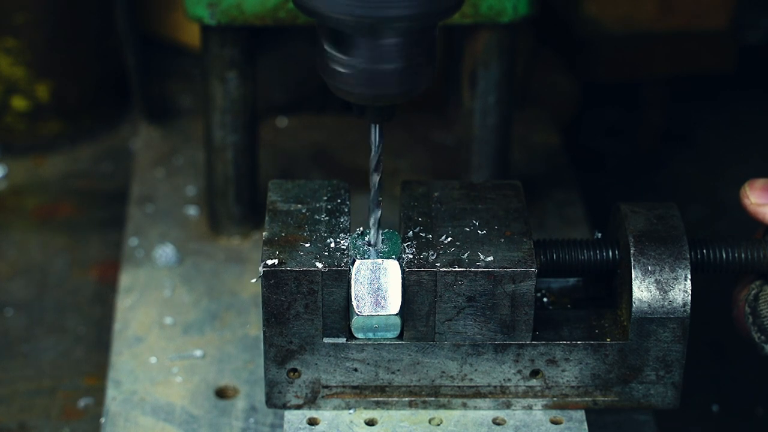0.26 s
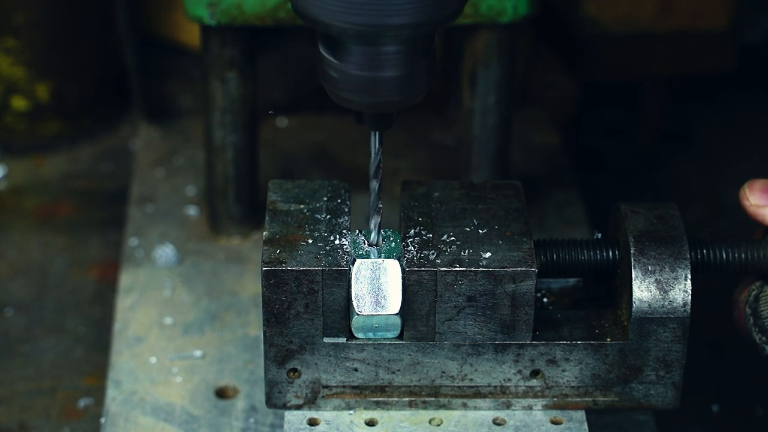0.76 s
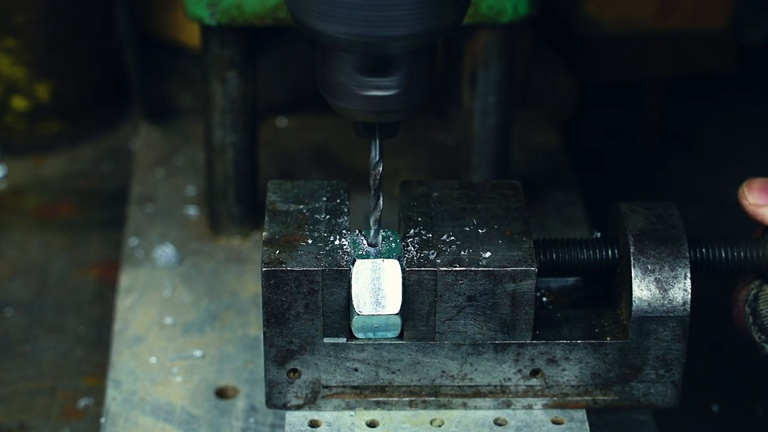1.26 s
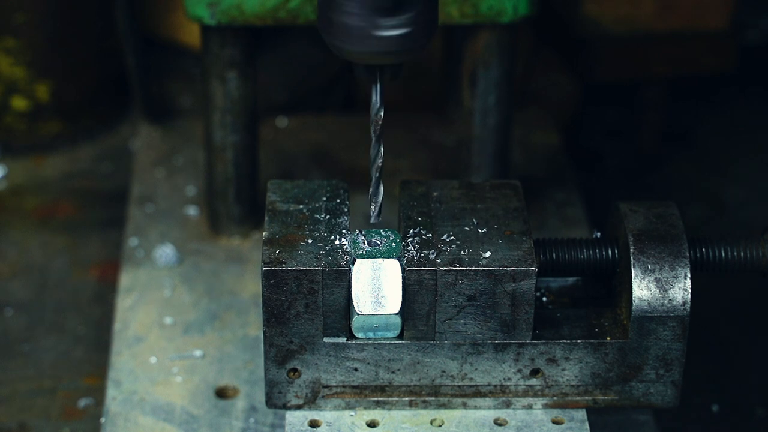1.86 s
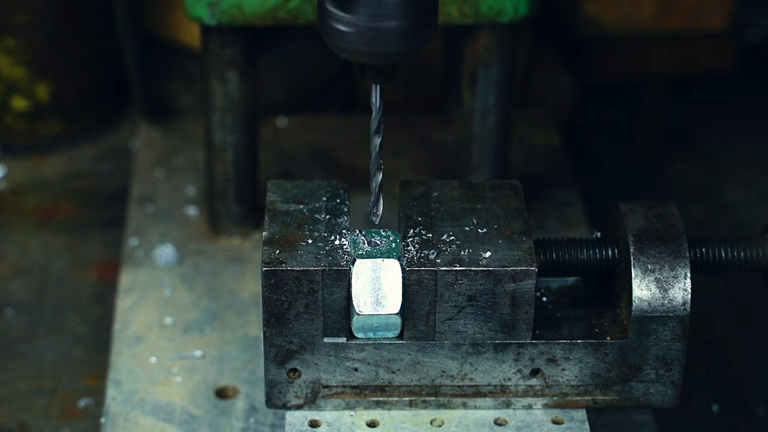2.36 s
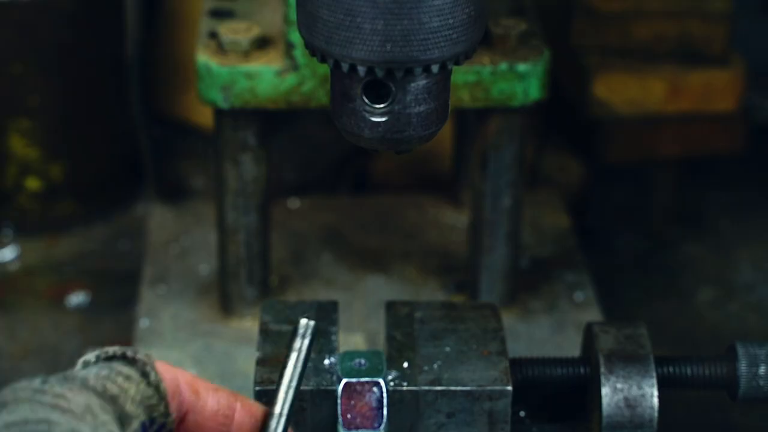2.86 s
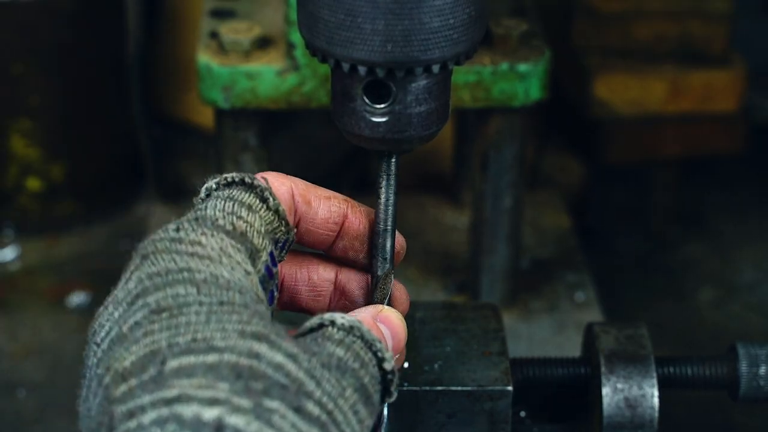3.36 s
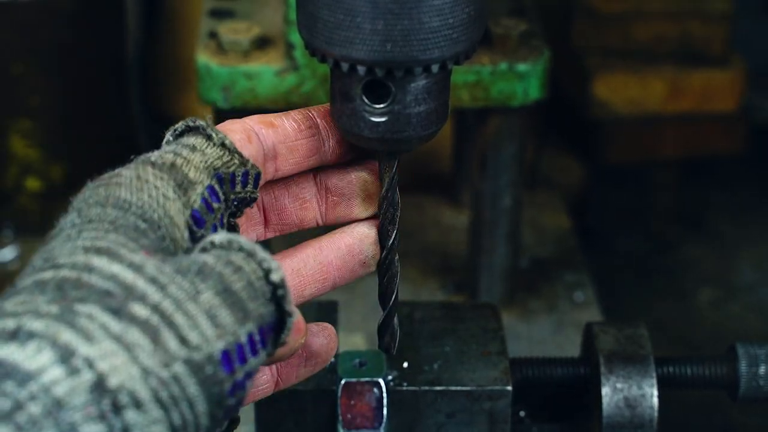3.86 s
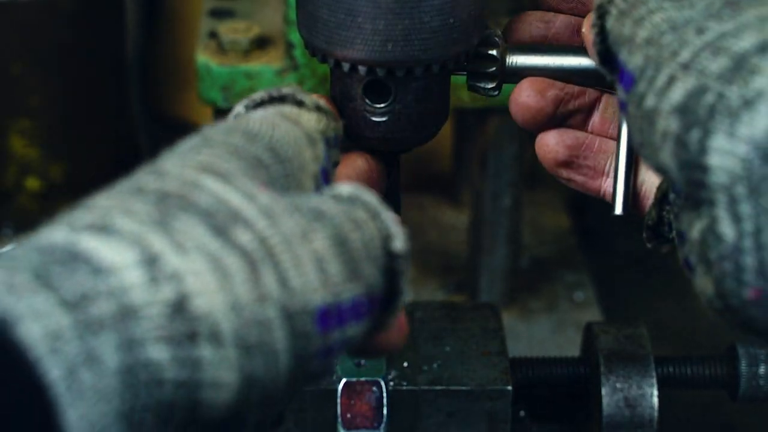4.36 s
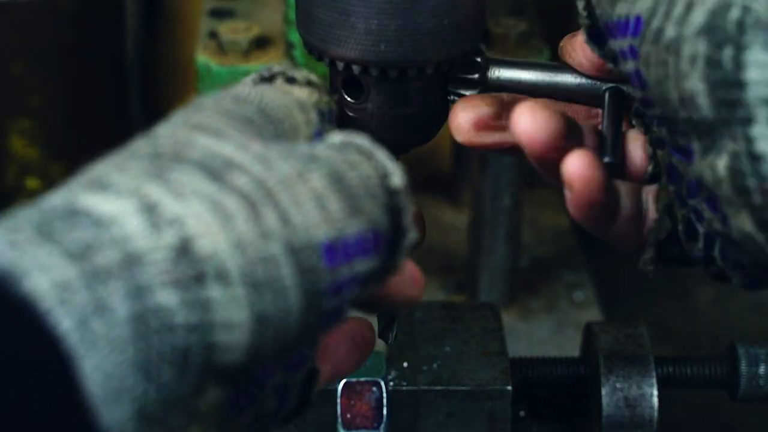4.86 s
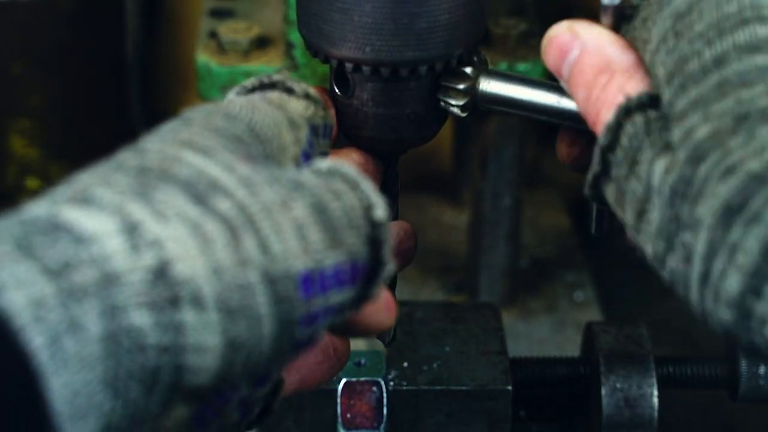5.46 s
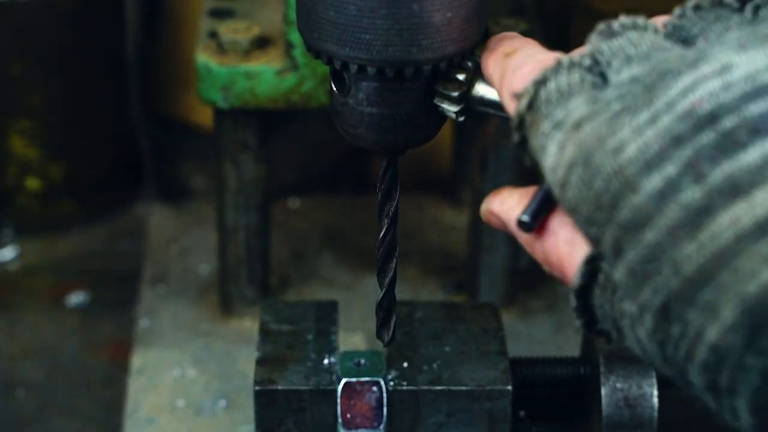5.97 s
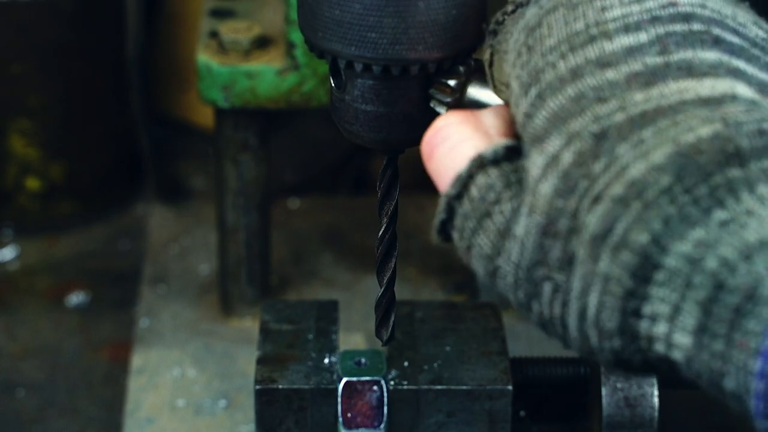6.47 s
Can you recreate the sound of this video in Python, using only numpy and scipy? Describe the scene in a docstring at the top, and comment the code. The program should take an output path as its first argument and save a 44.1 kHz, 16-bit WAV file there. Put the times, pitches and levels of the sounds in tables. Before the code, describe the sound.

Close in a small workshop, a drill press rattles loudly while its bit grinds a steel nut, chattering, chirping and squealing. Grinding fades as the bit lifts and spins free with knocks. The machine cuts off abruptly. Over quiet wide hiss, a fresh bit ticks and scrapes into the chuck, a key clicks sharply in its teeth, and gloves rustle softly with faint dull knocks.

```python
"""Drill press, then a new bit

A rattling drill press bores into a steel nut: shaped noise grinds and rattles, gliding chirps chatter in step
with the spindle, shrill noise squeaks, short tones whistle; the grinding fades as the bit lifts and spins free.
The machine sound then cuts off abruptly. Over a quiet hiss a new bit taps the chuck and slides in, and the
chuck key clicks into the gear teeth and is turned tight: short noise bursts ring the steel parts.
"""
import sys
import numpy as np
from scipy import signal
from scipy.fft import rfft, irfft, next_fast_len
from scipy.io import wavfile
from scipy.ndimage import uniform_filter1d, map_coordinates

SR = 44100
rng = np.random.default_rng(int(sys.argv[2]) if len(sys.argv) > 2 else 0)


def materialize(psi):
    """Save the field psi as 16-bit PCM at rate SR to the path in sys.argv[1].

    A 1-D psi becomes a single channel; in a 2-D psi each row is a channel.
    """
    bounded = np.clip(np.atleast_2d(psi).T, -1, 1)
    quanta = np.round(bounded * 32767).astype(np.int16)
    wavfile.write(sys.argv[1], SR, quanta)


N = 295896
TIME = np.arange(N) / SR
STOP_S = 2.774  # the machine is silent from here on
SPINDLE_HZ, MOTOR_HZ, BELT_HZ = 37.97, 24.2, 13.8  # turns per second
TOP_HZ = 15950  # middle of the final treble cut-off
# A blow thuds below THUD_HZ; its brightness is the level at its treble edge over that at CLINK_HZ.
THUD_HZ, CLINK_HZ = 895, 2840
EDGE_FALL_DB = 20.5  # lost in the octave above the edge
LAG_HZ = 701  # the body answers late mostly below this
CATCH_S, GLIDE_S = 0.00054, 0.0007  # time to a chirp's peak; time constant of its glide
STRETCH = .22  # how much chirps differ in length (natural log)
FREE_RING_HZ, BOUND_DAMPING = (5550, 6200), 0.29  # band of the free bit's song; share lost while caught

# The running press, steadied while the bit is in the nut: (time [s], rattle level [dB])
RUNNING = [(0, -20.5), (.3, -26.5), (1.35, -24.5), (1.6, -22), (2.25, -18.5), (2.55, -21)]
# The feed: a steady cut, the breakthrough, then the bit is drawn out: (time [s], grinding level [dB])
FEED = [(0, -23), (.75, -23), (.8, -30), (1.45, -37.5), (1.8, -59)]
# The lips bite deeper: (middle [s], length [s], level [dB])
BITES = [(.025, 0.096, -29), (.21, 0.09, -22), (.335, 0.11, -20.5), (.745, 0.043, -19.5)]
# Flutes rubbing in the hole: (time [s], squeak level [dB])
SQUEAK = [(0, -30), (.7, -26), (.8, -23), (1.4, -21.5), (1.53, -27), (2.45, -28), (2.76, -34)]
# Chips whistling in the flutes while the bit is deep in the nut: (time [s], level [dB], pitch [Hz])
SQUEAL = [(0, -22, 14000), (.65, -25.5, 13950), (.85, -23, 14200), (1.4, -22.5, 14270), (1.55, -35, 14500)]
# A trapped chip shrieks: (time [s], level [dB], pitch [Hz])
SHRIEKS = [(.757, -17.5, 10900), (.812, -16.5, 11300), (.892, -17, 12600), (1.142, -30, 11130),
           (1.224, -20, 11070), (1.36, -16, 11300)]
# Spells of chatter, before random scatter: (first catch [s], end [s], level [dB], start pitch [Hz],
# end pitch [Hz], lower mode [Hz], lower mode level [dB], deeper lip [dB])
CHATTER = [(0.307, 0.74, -15, 5280, 4040, 2940, -16.5, -2.5),
           (0.794, 0.918, -21.5, 5740, 6700, 2980, -8, 6),
           (0.924, 1.083, -20.5, 5840, 7570, 3980, -4.5, 3.5),
           (1.2527, 1.414, -20.5, 5670, 7340, 3910, -8.5, 5)]
# One value for each spell: (catches per turn)
CATCHES_PER_TURN = [2, 4, 4, 4]
# The lips snag hard and tear free: (time [s], level [dB], start pitch [Hz], end pitch [Hz])
SNAGS = [(0.506, -15, 5000, 2280)]
# Tones of the motor: (pitch [Hz], rms level [dB])
HUM = [(163, -76.5), (199.2, -70.5), (330, -68), (453, -76), (683.7, -51)]
# Tones that the cutting load draws from the drive: (pitch [Hz], level relative to the grinding [dB])
DRONE = [(380, -37), (414.5, -26.5), (454, -34)]

# Resonances of the press, clamped nut, chuck, new bit, tightened spindle and the key's crossbar:
# (centre [Hz], width [Hz], lift [dB])
FRAME = [(438, 35, 2.5), (624, 120, 12), (1250, 315, 6.5), (1745, 163, 9), (2364, 290, 10), (3170, 210, 8),
         (4020, 77, 9.5), (4570, 410, 9), (5600, 110, 6), (5910, 67, 8.5), (6040, 580, 9.5),
         (8600, 280, 5.5), (10370, 470, 6), (14480, 820, 15.5)]
NUT = [(430, 72, 0.5), (580, 34, 11.5), (695, 38, 9.5), (2750, 100, 3.5), (4350, 290, 8)]
CHUCK = [(424, 120, 18), (1440, 130, 8.3), (2320, 270, 13.7), (2850, 410, 9.8), (3400, 430, 4),
         (4900, 170, 5), (7400, 400, 3.4), (9500, 1400, 1.1)]
BIT = [(420, 77, 20), (2390, 560, 12.6), (2980, 550, 9.6), (9100, 1500, 8.2)]
SPINDLE = [(413, 160, 7.9), (793, 46, 16), (1040, 110, 8.7), (1596, 73, 8.2), (2480, 80, 8)]
CROSSBAR = [(2950, 900, 26), (8800, 700, 7.9), (14400, 1200, 8)]

# Tone colour of rattle, grinding, flutes, sliding steel, gloves and workshop hiss:
# (frequency [Hz], level [dB per Hz])
RATTLE = [(30, -55), (110, -36), (170, -30), (280, -20), (450, -15), (650, -12), (900, -5), (1300, -2.5),
          (2500, 0), (5000, -0.5), (7000, 3), (10000, -5.5), (13000, -10.5), (16000, -16)]
GRIND = [(30, -38), (110, -38), (270, -22), (400, -15), (700, -9.5), (1100, 1.5), (1800, 1), (3600, -2),
         (4400, -6.5), (6100, 0.5), (9500, -15.5), (13000, -26)]
FLUTES = [(500, -61), (2200, -22), (3100, -2), (4500, -12), (6100, -6), (8500, -15.5), (10000, -13.5),
          (11400, -7), (12800, -13.5), (14300, -8.5), (16000, -17)]
SLIDE = [(120, -64), (270, -42), (420, -12), (650, -17), (1100, -2.5), (1800, -16), (3600, -9.5),
         (7000, -3), (12200, -8), (14300, 0.5), (16000, -11)]
GLOVE = [(200, -47.5), (660, -9), (1300, -2.5), (1700, -6.5), (2400, -3.5), (6600, -8.5), (11300, -4),
         (16000, -9)]
AIR = [(30, -68), (120, -29), (270, -39), (420, -28), (650, -20), (890, -4), (1070, 0), (1330, -7.5),
       (1860, -9), (3500, -9), (7000, -11), (16000, -10.5)]

# How alike left and right are: (frequency [Hz], likeness [0 to 1])
PRESS_ALIKE = [(560, 1), (950, .85), (2400, .78), (6000, .44), (15000, .22)]
HAND_ALIKE = [(240, 0.9), (950, 1), (3800, 0.48), (15000, 0.079)]
AIR_ALIKE = [(240, 0.85), (950, 0.31), (3800, 0)]
# Stereo balance of the press: (frequency [Hz], left minus right [dB])
PRESS_SIDE = [(640, 0), (3100, -1.5), (6800, 2), (15000, -5)]
# How long the workshop echoes: (frequency [Hz], time to fall 60 dB [s])
SHOP = [(300, 0.74), (800, 0.19), (2100, 0.15), (5500, 0.14), (14600, 0.1)]

# Blows: (time [s], level [dB], treble edge [Hz], brightness [dB])
KNOCKS = [(.7555, -27, 14000, -5), (1.1214, -21, 14000, -10), (1.6168, -21.5, 15000, 2),
          (1.6625, -20, 15000, 2), (1.6908, -27, 15000, 12), (1.8393, -21.5, 5000, -16),
          (2.1638, -23, 14500, 1), (2.2855, -18.5, 5500, 1), (2.3435, -18, 5500, 0),
          (2.3814, -25, 6000, -4), (2.4298, -23.5, 15000, 14), (2.4656, -21.5, 15000, -3),
          (2.6491, -20.5, 15000, -17)]  # the spinning bit and quill knock
TAPS = [(3.0834, -39.5, 9700, 6), (3.166, -39, 15000, -11), (3.1762, -34.5, 15000, -5),
        (3.2255, -23, 13300, 19), (3.3698, -29, 14100, 8.5), (3.5102, -41, 15000, -20),
        (3.529, -48, 15000, -21), (3.545, -41, 15000, -14), (3.561, -41, 15000, -16),
        (3.575, -36, 15000, 10), (3.6068, -30.5, 14000, 19), (3.656, -28, 12000, 24),
        (3.661, -31.5, 12000, 17)]  # the new bit taps the jaws
CLICKS = [(4.3333, -23.5, 8300, 14), (4.3365, -23.5, 4700, 17.5), (4.399, -38, 6500, -1),
          (4.4054, -25, 5500, 18), (4.4098, -18, 9600, 25), (4.5393, -25.5, 6860, 3),
          (4.5445, -38, 6640, -11), (4.6118, -27.5, 13000, -9), (4.6907, -37, 12500, -17),
          (4.7771, -23.5, 7300, -5.5), (4.814, -38, 7500, -7), (4.8506, -37, 8000, -23),
          (4.9006, -47, 14000, -20), (5.1384, -42, 7500, -5), (5.2187, -36.5, 8000, -28),
          (5.2324, -55, 7000, -7), (5.246, -44, 8000, -13), (5.2624, -50, 7000, -6),
          (5.4102, -41, 5000, -8)]  # the key clicks on the chuck
SKIPS = [(4.2252, -38.5, 13100, 21), (4.281, -45, 12000, 13), (4.918, -48, 7000, 9),
         (5.6505, -48, 13500, 22), (5.7848, -47, 5000, -7), (5.855, -41.5, 13000, -4)]  # gear teeth skip over each other with a dry tick
PINGS = [(4.6907, -35, 12500, 9), (5.7583, -40, 15000, -1)]  # the loose crossbar of the key pings
TUGS = [(5.801, -40, 5500, -6), (5.977, -42, 4500, -5), (6.161, -38, 6500, -5), (6.294, -54, 5000, -6)]  # the spindle knocks in its play as it is gripped and forced
BUMPS = [(3.235, -67, 4000, -18), (4.29, -47, 4000, -15), (5.172, -51, 4000, -15),
         (5.772, -51.5, 4000, -12), (5.945, -58, 4000, -10), (6.132, -52.5, 4000, -8),
         (6.636, -56, 4000, -10)]  # the gloved hand bumps the chuck
# Steel slides on steel, first the shank in the jaws, later the key: (middle [s], length [s], level [dB])
SLIDES = [(3.205, 0.067, -64), (3.221, 0.0071, -46), (3.53, 0.052, -42.5), (3.595, 0.045, -40.5),
          (3.617, 0.039, -34.5), (3.656, 0.021, -32.5), (3.688, .02, -44), (4.383, 0.027, -42),
          (4.88, 0.071, -56), (5.235, 0.087, -50.5)]
# Strokes of the gloves on the steel: (middle [s], length [s], level [dB])
HANDS = [(2.88, 0.47, -51), (3.9, 0.44, -47), (4.2, 0.37, -46), (4.24, 0.034, -39.5), (4.91, 0.11, -49.5),
         (5.53, 0.13, -53), (5.92, 0.44, -49), (6.14, 0.4, -48.5)]
# Faint rustle of the gloves, until the hands come to rest: (time [s], level [dB])
HOLD = [(3.1, -60), (4.6, -50.5), (6.3, -62), (6.7, -68)]


def grinding():
    """The two cutting lips tear chips from the nut in uneven bites, heard as jolting noise."""
    lips = 0.29 * np.cos(2 * np.pi * 2 * SPINDLE_HZ * TIME)
    force = amp(2.3 * wobble(600) + 1.26 * wobble(50.55) + lips)
    strength = np.hypot(level(FEED), swells(BITES))
    return strength * rush(force, GRIND, PRESS_ALIKE, PRESS_SIDE, NUT, ripple_db=2.5)


def press():
    """Bearings, belt and quill rattle the frame, harder once per turn of spindle, motor and belt."""
    beat = lambda hz: np.sin(2 * np.pi * hz * TIME)
    turns = 0.25 * beat(SPINDLE_HZ) + 0.48 * beat(MOTOR_HZ) + 0.09 * beat(BELT_HZ)
    force = amp(0.96 * wobble(450) + 0.85 * wobble(45.06) + turns)
    return level(RUNNING) * rush(force, RATTLE, PRESS_ALIKE, PRESS_SIDE, FRAME, ripple_db=2.0)


def chatter(scatter_db=2.1, deepest_turn=.12, room_db=-9, fade_db=3):
    """The bit catches and springs free two or four times a turn, and once snags hard."""
    out = np.zeros(N)
    for spell, count in zip(CHATTER, CATCHES_PER_TURN):
        start, end, db, from_hz, to_hz, low_hz, low_db, uneven_db = spell
        for k, s in enumerate(np.arange(start, end, 1 / (count * SPINDLE_HZ))):
            size, detune, low_detune, slow = np.clip(rng.standard_normal(4), -1.5, 1.5)
            tune = 1 + 0.02 * detune
            # one lip cuts deeper
            bite_db = uneven_db * np.cos(2 * np.pi * (k / count - deepest_turn)) + scatter_db * size
            # each spell builds and dies away
            grip_db = fade_db * (np.sin(np.pi * (s - start) / (end - start)) ** .5 - .7)
            release = chirp(from_hz * tune, to_hz * tune, low_hz * (1 + 0.06 * low_detune), low_db,
                            np.exp(STRETCH * slow))
            add(out, s, amp(db + bite_db + grip_db) * release)
    for s, db, from_hz, to_hz in SNAGS:
        add(out, s, amp(db) * chirp(from_hz, to_hz, low_hz=2930, low_db=-14, lasts=2.14))
    # the thin bit radiates no bass
    out = signal.sosfilt(signal.butter(3, 1500, "high", fs=SR, output="sos"), out)
    return out + amp(room_db) * signal.fftconvolve(out[None], tail(), axes=1)[:, :N]


def chirp(from_hz, to_hz, low_hz, low_db, lasts=1, crack=0.2, low_lasts=2.7):
    """One release of the bit: a sharp gliding chirp over a lower mode."""
    t = np.arange(512) / SR
    swell = lambda life: (t / life * np.exp(1 - t / life)) ** .5  # peaks at t = life
    pitch = to_hz + (from_hz - to_hz) * np.exp(-t / (GLIDE_S * lasts))
    glide = np.sin(2 * np.pi * np.cumsum(pitch) / SR) + crack * rng.standard_normal(len(t))
    low_mode = swell(low_lasts * CATCH_S) * np.sin(2 * np.pi * low_hz * t)
    return swell(CATCH_S * lasts) * glide + amp(low_db) * low_mode


def squeaks(burst_db=7.0):
    """Flutes and chips rub the wall of the hole in shrill, irregular bursts."""
    force = amp(burst_db * np.tanh(wobble(170)) + 1.0 * np.sin(2 * np.pi * SPINDLE_HZ * TIME))
    modes = [(10700, 190, 3.6), (14375, 130, 6.9)]  # (centre [Hz], width [Hz], lift [dB])
    return level(SQUEAK) * rush(force, FLUTES, PRESS_ALIKE, PRESS_SIDE, modes, ripple_db=4.0)


def squeals(scatter_db=4, spread=0.019, length_s=.005, shriek_s=0.0059, waver=0.017, room_db=-5):
    """Chips stick and slip in the flutes: a stream of tiny whistles, and a few longer, lower shrieks."""
    t = np.arange(1024) / SR
    times = np.arange(0, SQUEAL[-1][0], 1 / (4 * SPINDLE_HZ))  # four slips a turn
    when, db, hz = np.transpose(SQUEAL)
    late, size, detune = rng.standard_normal((len(times), 3)).T
    starts = times + late * length_s / 2
    levels = np.interp(times, when, db) + scatter_db * np.minimum(size, 1.5)
    pitches = np.interp(times, when, hz) * (1 + spread * detune)
    whistles = zip(starts, levels, pitches)
    out = np.zeros((2, N))
    for rows, length in ((whistles, length_s), (SHRIEKS, shriek_s)):
        swell = np.sin(np.pi * np.minimum(t / length, 1))
        for s, peak_db, pitch in rows:
            drift = unit(uniform_filter1d(rng.standard_normal((2, len(t))), size=40))
            phase = 2 * np.pi * np.cumsum(pitch * (1 + waver * drift), axis=1) / SR
            add(out, s, amp(peak_db) * swell * np.sin(phase))
    room = signal.fftconvolve(out, tail(), axes=1)[:, :N]
    return placed(out + amp(room_db) * room, PRESS_ALIKE, PRESS_SIDE)


def knocks():
    """The spinning bit and quill knock the frame, which rings briefly."""
    return strikes(KNOCKS, FRAME, PRESS_ALIKE, crack_t60=0.021, ring_db=-4.5, ring_t60=0.075,
                   room_db=0, thud_db=-6.0, bass_db=-27.5)


def motor(drift=0.0057, swing_db=4):
    """The motor hums and drones with the cut; all tones waver together but swell and fade singly."""
    clock = TIME + drift * np.cumsum(wobble(4.05)) / SR
    tone = lambda hz: unit(amp(swing_db * wobble(6.2)) * np.sin(2 * np.pi * hz * clock))
    hum = sum(amp(db) * tone(hz) for hz, db in HUM)
    drone = sum(amp(db) * tone(hz) for hz, db in DRONE)
    return hum + level(FEED) * drone


def bound(x):
    """While the bit is caught in the nut, its free ring is damped."""
    spells = sum(1. * (TIME > start) * (TIME < end) for start, end, *_ in CHATTER)
    caught = uniform_filter1d(spells, size=1500)
    ring = signal.sosfiltfilt(signal.butter(2, FREE_RING_HZ, "band", fs=SR, output="sos"), x)
    return x - BOUND_DAMPING * caught * ring


def shifting(x, depth_db=2.0):
    """As the load shifts, each narrow band of pitches swells and fades on its own."""
    z = signal.stft(x, nperseg=1024)[2]
    field = uniform_filter1d(rng.standard_normal(z.shape[1:]), size=4, axis=0)  # over pitch
    field = uniform_filter1d(field, size=7, axis=1)  # over time
    moving = signal.istft(z * amp(depth_db * unit(field)), nperseg=1024)[1][:, :N]
    return np.std(x) * unit(moving)


def handling():
    """Sliding steel and gloves are shaped noise; taps, clicks and bumps are ringing blows."""
    return scrapes() + gloves() + contacts()


def scrapes():
    """Shank and key slide on steel: rough noise through the bit's modes, with a soft jaw rattle."""
    push = swells(SLIDES)
    roughness = amp(1.7 * wobble(1800) + 1.2 * wobble(200))
    scrape = push * rush(roughness, SLIDE, HAND_ALIKE, modes=BIT[1:3])
    jaw_colour = [(1200, -27.0), (2400, -1), (3000, -2), (4500, -27)]  # (frequency [Hz], level [dB per Hz])
    # even a light touch sets the loose jaws rattling
    jaws = np.minimum(push, amp(-51.0)) * rush(amp(1.5 * wobble(250)), jaw_colour, HAND_ALIKE)
    return scrape + jaws


def gloves():
    """Gloves rub on steel: uneven noise that swells with each stroke over a faint rustle."""
    strength = np.hypot(level(HOLD), swells(HANDS))
    return strength * rush(amp(1.6 * wobble(700) + 0.52 * wobble(26)), GLOVE, AIR_ALIKE)


def contacts():
    """Bit, key and hands strike the steel; each kind has its own ring and thud."""
    taps = strikes(TAPS, BIT, HAND_ALIKE, crack_t60=0.0045, ring_db=1, ring_t60=0.036, room_db=-0.5,
                   thud_db=-14, bass_db=-44, ripple_db=3.0, lag_s=.018)
    clicks = strikes(CLICKS, CHUCK, HAND_ALIKE, crack_t60=0.013, ring_db=-7.5, ring_t60=0.033,
                     room_db=-4.0, thud_db=-18.5, bass_db=-25, ripple_db=2.0, lag_s=.018)
    tugs = strikes(TUGS, SPINDLE, HAND_ALIKE, crack_t60=0.02, ring_db=-7.0, ring_t60=0.11,
                   room_db=-4.5, thud_db=-1.0, bass_db=-34, ripple_db=2.5, lag_s=0.01006)
    bumps = strikes(BUMPS, SPINDLE[:1], HAND_ALIKE, crack_t60=0.034, ring_db=-30, ring_t60=0.068,
                    room_db=-7, thud_db=23, bass_db=-37)
    light = dict(crack_t60=0.0047, ring_db=-8, ring_t60=0.023, room_db=-5.0,
                 thud_db=-24.0, bass_db=-29, ripple_db=2.0)
    skips = strikes(SKIPS, CHUCK[:1], HAND_ALIKE, **light)
    pings = strikes(PINGS, CROSSBAR, HAND_ALIKE, **light)
    return taps + clicks + skips + pings + tugs + bumps


def strikes(rows, modes, alike, crack_t60, ring_db, ring_t60, room_db, thud_db, bass_db,
            ripple_db=2.0, lag_s=0):
    """Steel meets steel: a crack, a quickly damped ring and the room; t60 is seconds to fall 60 dB."""
    out = np.zeros((2, N))
    fine = thicket(ripple_db, 60)
    slope = [(100, bass_db), (250, bass_db + 3), (550, -9.5), (1000, 2.5)]
    body = lambda hz: lift(modes, hz) + along(fine, hz) + along(slope, hz)
    treble = np.linspace(THUD_HZ, TOP_HZ, 512)
    for s, db, edge_hz, bright_db in rows:
        room = tail()
        t = np.arange(room.shape[1]) / SR
        burst = lambda t60: unit(rng.standard_normal(room.shape) * amp(-60 * t / t60)) / np.sqrt(len(t))
        blow = burst(crack_t60) + amp(ring_db) * burst(ring_t60) + amp(room_db) * room
        clink = [(CLINK_HZ, 0), (edge_hz, bright_db), (2 * edge_hz, bright_db - EDGE_FALL_DB)]
        clink_db = 10 * np.log10(np.mean(amp(along(clink, treble) + body(treble)) ** 2))
        contact = [(THUD_HZ, clink_db + thud_db)] + clink  # the thud keeps its share of every blow
        hit = lagging(coloured(blow, lambda hz: along(contact, hz) + body(hz)), lag_s)
        early = np.std(hit[:, t < .01], axis=1, keepdims=True)  # the first 10 ms set the level
        add(out, s, amp(db) * hit / early)
    # small parts radiate no bass
    return placed(signal.sosfilt(signal.butter(3, 300, "high", fs=SR, output="sos"), out), alike)


def lagging(x, lag_s):
    """Low bending waves cross the steel slowly and by many paths, so the thud trails the click."""
    n = x.shape[-1]
    hz = np.fft.rfftfreq(2 * n, 1 / SR)
    paths = np.interp(hz, np.linspace(0, SR / 2, 256), rng.uniform(0, 2, 256))
    delay = lag_s * paths * np.exp(-hz / LAG_HZ)
    phase = 2 * np.pi * hz[1] * (delay.sum() - np.cumsum(delay))
    return irfft(rfft(x, 2 * n) * np.exp(1j * phase))[..., :n]


def workshop_air():
    """The quiet workshop is a steady, wide hiss."""
    return amp(-52.0) * rush(1, AIR, AIR_ALIKE)


def tail(size=8192):
    """A fresh stereo echo of the workshop: noise that dies at its own speed at each pitch."""
    hz, t, z = signal.stft(rng.standard_normal((2, size)), SR, nperseg=256)
    fade = amp(-60 * t / along(SHOP, hz)[:, None])
    return unit(signal.istft(z * fade, SR, nperseg=256)[1]) / np.sqrt(size)


def rush(force, spectrum, alike, side=((1000, 0),), modes=((1000, 100, 0),), ripple_db=0):
    """Countless tiny contacts under a varying force, ringing a body; rms 1."""
    touches = force * rng.standard_normal((2, N))
    fine = thicket(ripple_db, 25)
    colour = lambda hz: along(spectrum, hz) + lift(modes, hz) + along(fine, hz)
    return unit(placed(coloured(touches, colour), alike, side))


def thicket(depth_db, spacing_hz):
    """The many weak, close modes of a steel body as (frequency [Hz], lift [dB]) points."""
    hz = np.arange(0, SR / 2, spacing_hz)
    return np.transpose([hz, depth_db * rng.standard_normal(len(hz))])


def lift(modes, hz):
    """The dB that resonances add at each frequency."""
    return sum(db / (1 + (2 * (hz - centre) / width) ** 2) for centre, width, db in modes)


def coloured(x, gain_db):
    """Filter x by a gain in dB that depends on frequency, with no sound ahead of its cause."""
    n = x.shape[-1]
    m = 2 * next_fast_len(n // 2 + 2048)
    cepstrum = irfft(np.log(amp(gain_db(np.fft.rfftfreq(m, 1 / SR))) + 1e-6), m)
    # folding the cepstrum forward gives the minimum-phase filter
    cepstrum[1:m // 2] *= 2
    cepstrum[m // 2 + 1:] = 0
    return irfft(rfft(x, m) * np.exp(rfft(cepstrum)), m)[..., :n]


def placed(pair, alike, side=((1000, 0),)):
    """Mix two signals into left and right with a given likeness and balance."""
    n = pair.shape[-1]
    m = next_fast_len(n + 2048)
    hz = np.fft.rfftfreq(m, 1 / SR)
    turn = np.arccos(np.clip(along(alike, hz), -1, 1)) / 2
    a, b = rfft(pair, m) * [np.cos(turn), np.sin(turn)]
    lean = amp(along(side, hz) / 2)
    return irfft([(a + b) * lean, (a - b) / lean], m)[:, :n]


def swells(rows):
    """(middle [s], length [s], level [dB]) strokes as a gain; each rises and falls like a bell."""
    bells = (amp(db) * np.exp(-(2 * (TIME - s) / length) ** 2) for s, length, db in rows)
    return np.sqrt(sum(bell ** 2 for bell in bells))


def level(rows):
    """(time [s], level [dB]) rows as a gain for every sample."""
    return amp(np.interp(TIME, *np.transpose(rows)))


def wobble(rate):
    """A smooth random curve of rms 1 through `rate` random points a second."""
    points = rng.standard_normal(int(N * rate / SR) + 4)
    return unit(map_coordinates(points, [TIME * rate], order=2))


def along(points, hz):
    """(frequency [Hz], value) points read on a log axis."""
    f, v = np.transpose(points)
    return np.interp(np.log(hz + 1), np.log(f + 1), v)


def add(track, s, sound):
    """Mix a sound into a track at time s in seconds."""
    part = track[..., max(0, round(s * SR)):][..., :sound.shape[-1]]
    part += sound[..., :part.shape[-1]]


def amp(db):
    """Decibels to gain."""
    return 10 ** (np.asarray(db) / 20)


def unit(x):
    """Scale to rms 1."""
    return x / np.sqrt(np.mean(x ** 2) + 1e-20)


def scene():
    """The machine sound ends in a 2 ms fade; the handling and the workshop hiss have no such cut."""
    cutting = bound(shifting(press() + grinding()) + squeaks())
    drilling = cutting + chatter() + squeals() + knocks()
    running = np.clip((STOP_S - TIME) / .002, 0, 1)
    return running * (motor() + drilling) + handling() + workshop_air()


def record(dry):
    """Fade out the highest treble over 300 Hz around TOP_HZ."""
    m = next_fast_len(N + 8192)
    hz = np.fft.rfftfreq(m, 1 / SR)
    keep = np.clip((TOP_HZ - hz) / 300 + .5, 0, 1)
    return irfft(rfft(dry, m) * keep, m)[:, :N]


dry = scene()
out = record(dry)
materialize(out)
```